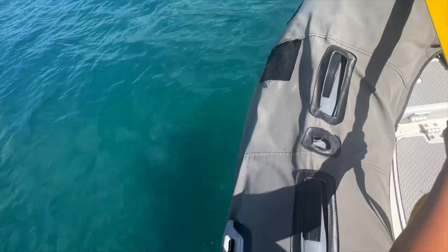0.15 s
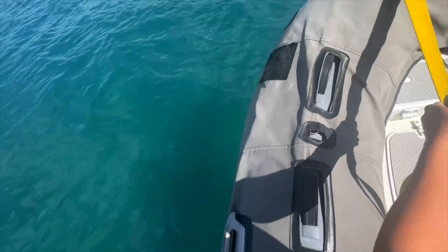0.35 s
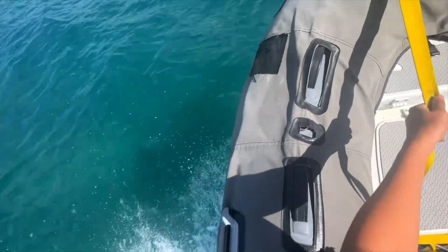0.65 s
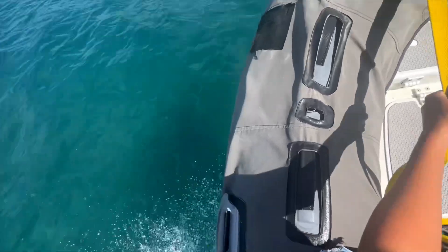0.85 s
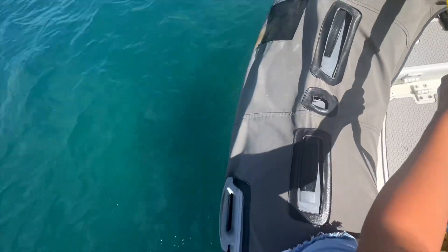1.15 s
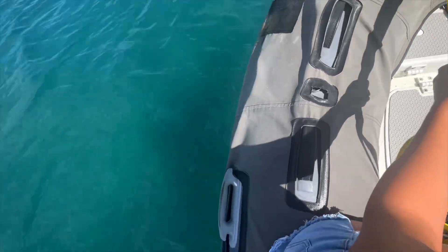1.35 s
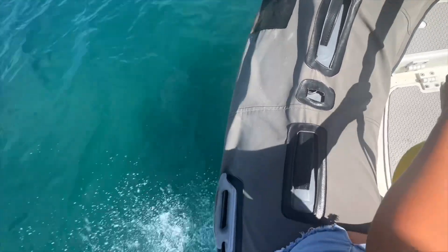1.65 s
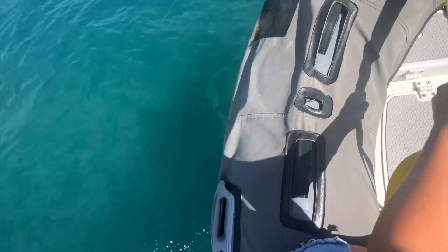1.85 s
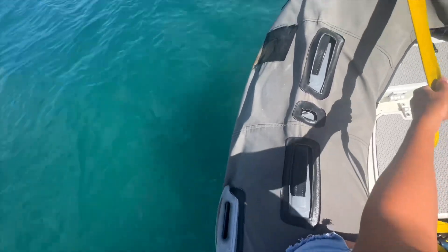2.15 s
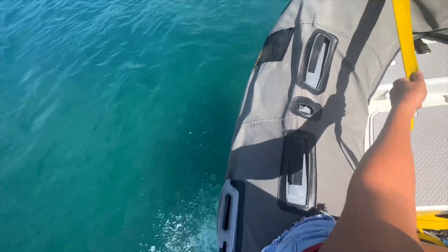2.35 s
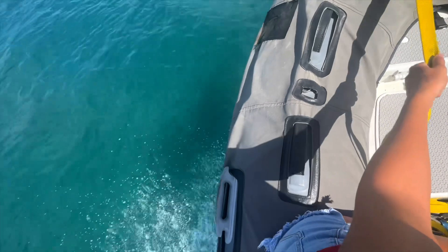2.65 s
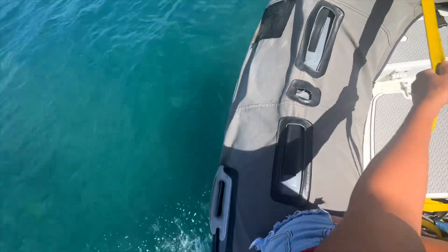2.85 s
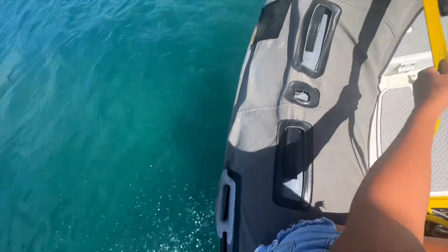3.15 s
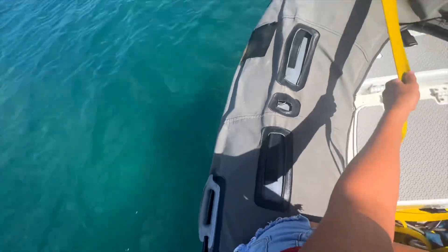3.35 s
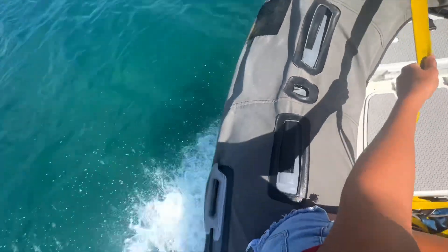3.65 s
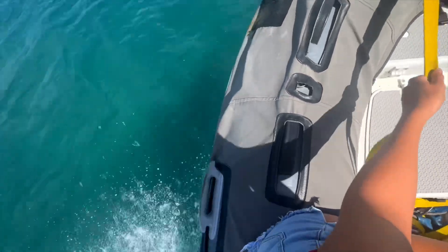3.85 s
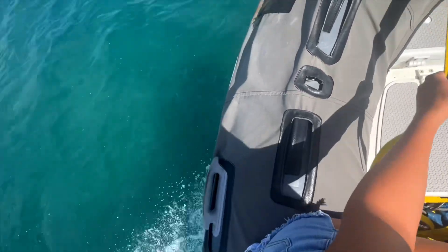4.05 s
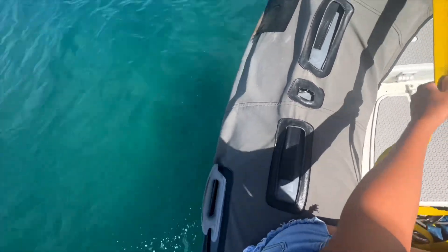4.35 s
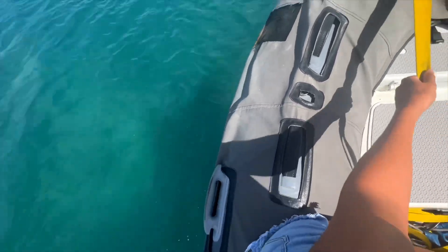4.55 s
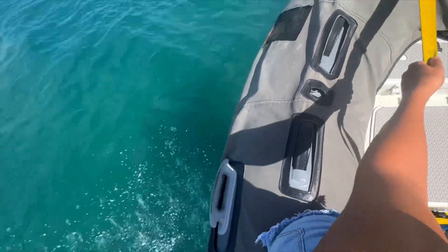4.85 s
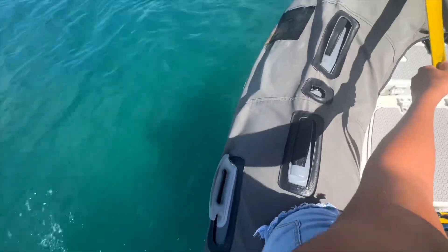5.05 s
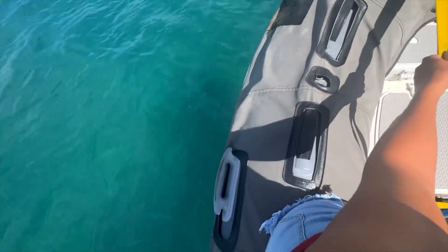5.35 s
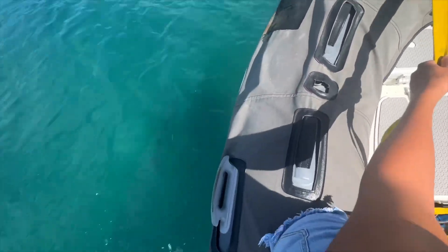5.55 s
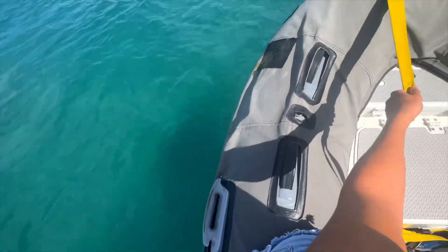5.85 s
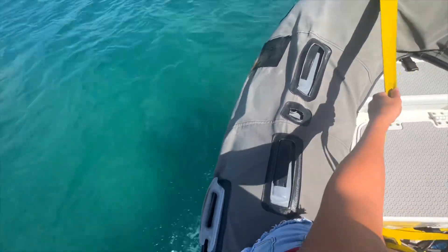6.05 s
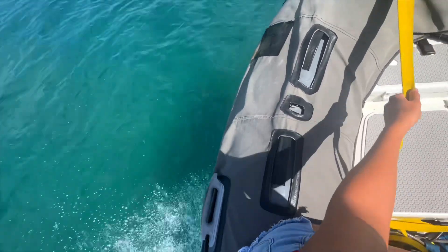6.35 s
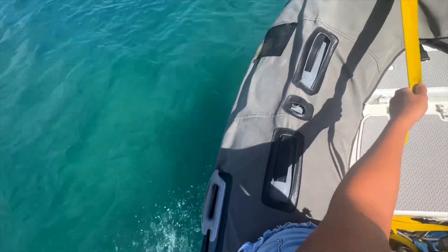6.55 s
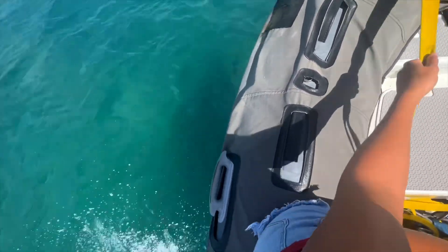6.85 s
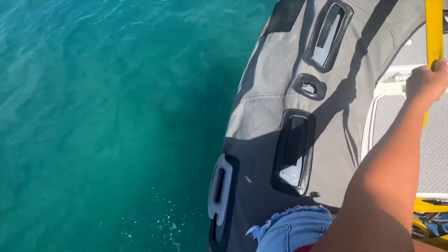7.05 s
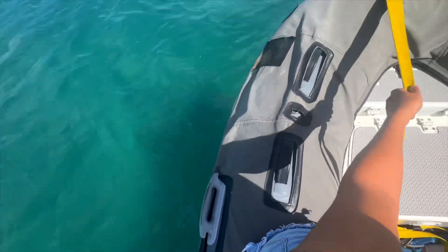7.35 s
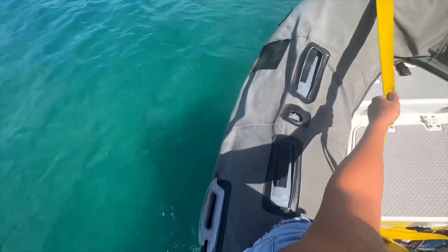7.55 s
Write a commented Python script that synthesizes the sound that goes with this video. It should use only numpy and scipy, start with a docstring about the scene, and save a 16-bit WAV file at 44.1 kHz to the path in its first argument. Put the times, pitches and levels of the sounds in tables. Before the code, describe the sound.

Aboard an inflatable dinghy on open, choppy water, a small outboard starts muffled and faint, then settles into a low burbling drone with a thin gear whine. Around one second a gust thumps and crackles on the microphone. Afterward the bow wave washes and froths, spray patters and hisses, and occasional waves slap the hull softly. The stereo sound is close, outdoors and without echo.

```python
"""A small outboard drones and burbles, its gears whining faintly, as an inflatable dinghy runs over choppy sea.
The bow wave washes, spray patters and hisses, and near the start a gust buffets the microphone.
Motor tones are partials locked to the firing phase; gas, water and wind are coloured stereo noise,
with random clicks for drops and ringing clicks for bubbles. Slaps and ticks are struck resonances."""
import sys
import numpy as np
from scipy import signal
from scipy.fft import rfft, irfft
from scipy.io import wavfile

SR = 44100
rng = np.random.default_rng(int(sys.argv[2]) if len(sys.argv) > 2 else 0)


def inscribe(sig):
    """Save sig as 16-bit PCM at rate SR to the path in sys.argv[1].

    A 1-D sig is mono; a 2-D sig holds one channel per row.
    Samples are clipped to [-1, 1] before scaling.
    """
    pcm = np.round(np.clip(np.atleast_2d(sig).T, -1, 1) * 32767)
    wavfile.write(sys.argv[1], SR, pcm.astype(np.int16))


N = 339808
TIME = np.arange(N) / SR
BINS_HZ = np.maximum(np.arange(N // 2 + 1) * SR / N, 1)

# bearing of the motor: [t/s, motor left-right/dB, left port lead/rad of a firing, bass stereo width/dB]
BEARING = [(0, -8, 0, -60), (1.1, 3, 0.25, -27), (1.5, 15.5, 0.34, -18), (2, 16, 0.3, -8.5),
           (2.6, 6.5, 0.38, -0.5), (3.6, 2.5, 0.22, 8), (4.5, 0.5, 0.12, 13), (5.1, -0.5, 0.21, 8),
           (5.6, -0.5, 0.17, 14), (6.3, 0, 0.13, 10.5), (7.71, 0, 0.11, 8)]


def exhaust(firing, low_db, octave_db, pipe_db, lean_db, lead_rad, smear_rad=0.37):
    """Each firing is a pressure dip, then the ring of the exhaust housing; the two cylinders differ slightly."""
    # upper partials of the firing pulse: [multiple of firing rate, relative level/dB]
    pipe_orders = [(3, -16), (4, -0.5), (5, 0), (5.5, -20), (6, -9.5), (7, -15), (8, -18)]
    # swell and fade of the fourth and fifth partials: [t/s, gain/dB]
    fourth_swell = [(0, -0.5), (2.05, -1), (2.5, -0.5), (2.66, 5.5), (2.77, -4.5), (2.9, 7), (3.0, 0),
                    (3.12, 5.5), (3.35, -4.5), (4.3, -1), (5.4, -1.5), (5.75, -2), (6.1, -3), (6.3, 3),
                    (6.5, -3.5), (6.95, 2), (7.15, -1.5), (7.71, 1.5)]
    fifth_swell = [(0, -0.5), (1.85, 1), (2.05, 0.5), (2.6, 0), (3.2, 0.5), (3.9, 0), (4.35, -3), (4.9, 1),
                   (5.15, -3), (5.45, -1.5), (5.95, 1.5), (6.6, 1), (7.05, -2), (7.3, 1), (7.52, -7),
                   (7.71, 2)]

    firing = firing + lead_rad * np.array([[.5], [-.5]])  # the nearer port hears the motor first
    half_orders = from_db(-29) * np.cos(3 * firing / 2)  # cylinder difference
    low = from_db(low_db + 2.5) * (partial(firing, waver=0.019, port_waver=0.093) + half_orders)
    octave = from_db(octave_db + 4.0) * partial(2 * firing, waver=0.023, port_waver=0.021)

    late = firing - 2.3 + 0.068 * drift(35)  # no two firings are alike
    swell_db = {4: in_time(fourth_swell)[0], 5: in_time(fifth_swell)[0]}
    pipe = 0
    for order, db in pipe_orders:
        phase = order * late - smear_rad * (order - 5) ** 2  # unequal delays smear the pulse
        gain = from_db(db + swell_db.get(order, 0))
        pipe = pipe + gain * partial(phase, waver=0.1, port_waver=0.12)
    pipe_gain = from_db(pipe_db + 2.1 * drift(35))
    return -(low + octave) * pan(lean_db) - pipe_gain * pipe * pan(.5 * lean_db)


def exhaust_levels():
    """Fundamental, octave and pipe ring in dB: slow course, flutter as water washes the outlet, brief dips."""
    # [t/s, fundamental/dB, octave/dB, pipe ring/dB], relative
    courses = [(0, -51, -53, -66), (.25, -36.5, -46, -55), (.5, -36, -42.5, -48.5),
               (1.48, -33, -45.5, -49.5), (1.67, -34.5, -38, -48), (2.03, -32, -37.5, -40),
               (2.65, -30, -32.5, -37), (3.0, -29, -32.5, -40.5), (3.5, -31.5, -35.5, -39.5),
               (3.85, -28.5, -35, -40), (4.55, -31, -35.5, -42), (5.3, -30, -37, -40),
               (5.85, -35.5, -36, -40), (6.45, -30.5, -34.5, -42.5), (7.3, -31, -36, -41),
               (7.71, -35.5, -44.5, -44.5)]
    # flutter spread: [fundamental/dB, octave/dB, pipe ring/dB]
    flutter_spread = (.8, .8, .8)
    # Gaussian level changes, mostly dips: [centre t/s, full 1/e width/s, fundamental/dB, octave/dB]
    dips = [(1.402, 0.18, -4, -0.5), (3.942, 0.054, 1, -13), (4.34, 0.1, -11, -2), (4.44, 0.041, -17, -2),
            (5.735, .04, -12, -2), (5.787, 0.12, 2, -8), (6.03, 0.089, -8, -1), (6.97, 0.11, -3.5, -3)]

    flutter_per_s = 3.4
    low_db, octave_db, pipe_db = (
        db + spread_db * drift(flutter_per_s) for db, spread_db in zip(in_time(courses), flutter_spread))
    low_dip, octave_dip = 0, 0
    for centre_s, width_s, low_change_db, octave_change_db in dips:
        shape = np.exp(-np.minimum((2 * (TIME - centre_s) / width_s) ** 2, 50))
        low_dip = low_dip + low_change_db * shape
        octave_dip = octave_dip + octave_change_db * shape
    return low_db + low_dip, octave_db + octave_dip, pipe_db


def burble(firing, pipe_db, lean_db, lead_rad):
    """Exhaust gas breaks up in the water, one puff per firing; the nearer port hears it first."""
    # [f/Hz, relative level/dB]
    gas_spectrum = [(32, -9), (45, -4.5), (65, 3.5), (125, -1.5), (190, -6.5), (290, -9), (390, -8.5),
                    (480, -18.5), (700, -27)]
    # [f/Hz, left-right correlation]
    port_likeness = [(60, 0.98), (140, 0.81), (205, .1), (290, 0.91), (600, 0.96)]

    puffs = 1 + 0.078 * np.cos(firing - 2.6)
    gas = spread(white() * puffs, gas_spectrum, at_bins(port_likeness), lean_db=-2.0)
    lag_samples = lead_rad / np.gradient(firing)
    n = np.arange(N)
    gas = np.array([np.interp(n + side * lag_samples, n, port) for side, port in zip((.5, -.5), gas)])
    return from_db(pipe_db + 0.6 + 0.75 * drift(10)) * gas * pan(0.096 * lean_db)


def cowl(firing):
    """Valve clatter keeps the cowl ringing in narrow modes, each swelling and fading by itself."""
    # [t/s, level/dB]
    course = [(0, -61), (.6, -51), (1.2, -53), (1.9, -51), (2.3, -52.5), (3, -57.5), (5, -57.5), (6.5, -54),
              (7.71, -60)]
    # [f/Hz, bandwidth/Hz, relative level/dB]
    modes = [(1145, 180, -0.5), (1340, 76, -4.5), (1698, 54, -4), (1830, 60, -10), (1967, 120, -4.5),
             (2124, 80, -11), (3340, 590, -13)]

    cowl_db, = in_time(course)
    clatter = white() * (1 + 0.32 * np.cos(firing - 1))
    ringing = 0
    for hz, width_hz, db in modes:
        gain = from_db(db + 3.4 * drift(9))
        ringing = ringing + gain * rms_one(ring(clatter, hz, t60_of(width_hz)))
    return from_db(cowl_db) * rms_one(ringing)


def whine(firing):
    """Thin gear tones follow the engine speed; three groups come and go."""
    # [t/s, low group/dB, middle group/dB, high group/dB]
    group_levels = [(0, -71, -79, -85), (1.2, -60, -63.5, -78), (2.05, -59, -63.5, -72),
                    (2.3, -62, -78, -87), (3.0, -55.5, -70, -75), (3.5, -83, -66.5, -70),
                    (4.7, -62, -74, -64.5), (5.4, -68, -78, -71), (6.3, -57.5, -76, -72),
                    (6.7, -63.5, -73, -68), (7.25, -56.5, -87, -78), (7.71, -71, -77, -73)]
    # per group: [multiples of firing rate]
    group_orders = [(18,), (26, 27), (29, 30)]

    out = 0
    for level_db, orders in zip(in_time(group_levels), group_orders):
        for order in orders:
            out = out + from_db(level_db) * partial(order * firing, waver=0.48, port_waver=0.38)
    return out


def gears(firing):
    """Faint, unsteady gear and valve tones locked to the crankshaft, loudest about half a second in."""
    # [multiple of firing rate, relative level/dB]
    tones = [(9, -60.5), (11, -65), (13, -76), (22, -63), (32, -73), (33, -69)]

    heard_db, = in_time([(0, -8), (.6, -5), (1.3, -7.5), (7.71, -6)])
    tone_sum = sum(from_db(db + 1.0) * partial(order * firing, waver=0.21, port_waver=1.0)
                   for order, db in tones)
    return from_db(heard_db) * tone_sum


def water(firing):
    """Bow wave froths with ringing bubbles; the motor's clatter pulses faintly in the splashing."""
    # [t/s, bow wave/dB, splashing/dB], relative
    wash = [(0, -55.5, -57), (.45, -51, -59.5), (1.2, -55.5, -55), (1.9, -55.5, -58.5), (3.0, -49, -51),
            (4.8, -50.5, -54), (7.25, -49.5, -55), (7.71, -52, -58.5)]
    # the bow pushes into a wave: [start t/s, length/s, bow wave change/dB]
    surges = [(3.19, 0.31, 2), (3.98, 0.12, 1), (5.13, 0.35, 3.5), (6.3, .13, -1), (6.58, 0.23, 0.5),
              (7.08, 0.17, 1)]
    # both spectra: [f/Hz, relative level/dB]
    bow_spectrum = [(250, 4), (480, -3.5), (600, -2), (720, -3), (880, 1), (970, -3), (1100, -19.5),
                    (1500, -6), (2500, -48)]
    splash_spectrum = [(600, -1), (1000, 1.5), (1170, 1), (1420, 0), (1560, 3.5), (1700, 1.5), (1820, -2.5),
                       (2020, 2), (2300, -8), (3200, -16)]

    splash_share = 0.14  # of the bow wave's change in dB
    surge_db, = water_rise(surges)
    wave_db, splash_db = in_time(wash) + np.outer([1, splash_share], surge_db)
    froth = white() + 0.3 * bubbles(700, low_hz=450, high_hz=1300, cycles=7.5)
    clatter_pulse = 1 + 0.063 * np.cos(firing)
    splash = white() * clatter_pulse + 0.17 * bubbles(1500, low_hz=1047, high_hz=2570, cycles=13.0)
    bow = from_db(wave_db + 1.5 + 1.1 * drift(22)) * around(froth, bow_spectrum)
    return bow + from_db(splash_db + 2.5) * flickering(splash, splash_spectrum, flicker_db=1.5, count=8)


def splashes():
    """Single splashes and gurgles: bursts of droplets and froth, each in a band of its own."""
    # [start t/s, length/s, level/dB, centre f/Hz, width/octaves]
    bursts = [(1.81, 0.098, -59, 1830, .15), (1.98, .24, -44.5, 362, 0.21), (2.02, 0.046, -54, 1780, 0.34),
              (2.5, .08, -54, 1500, 0.4), (2.983, 0.05, -52, 2020, 0.19), (3.105, 0.022, -54, 3460, 0.65),
              (3.192, .06, -42, 190, .5), (3.43, 0.092, -48, 190, 0.5), (3.222, 0.02, -43.5, 750, 0.78),
              (3.232, .018, -53, 4000, .9), (3.355, 0.012, -42.5, 1010, 1.3), (3.34, 0.017, -52, 3500, 0.7),
              (3.555, 0.05, -59, 2080, .15), (4.335, 0.074, -45, 190, 0.39), (4.446, .12, -56, 2020, 0.22),
              (5.086, 0.035, -56, 1370, 0.37), (5.11, 0.21, -41, 160, 1.1), (5.276, .06, -57, 950, 1.2),
              (5.51, .05, -54, 1950, .3), (6.67, .07, -43, 372, .3), (6.86, 0.15, -57, 2030, .2),
              (7.136, 0.052, -52, 780, 0.88)]

    froth, out = white() + 0.76 * rms_one(drops(900, size_db=11.0)), 0
    for start_s, length_s, db, hz, octaves in bursts:
        edges_hz = hz * 2 ** (np.array([-.5, .5]) * max(octaves, .05))
        edges_hz = np.clip(edges_hz, 20, .45 * SR)
        band_pass = signal.butter(2, edges_hz, "band", fs=SR, output="sos")
        band = rms_one(signal.sosfilt(band_pass, froth))
        out = out + from_db(db) * swell(start_s, length_s, attack_share=.25, release_s=0.017) * band
    return out


def slaps():
    """Waves slap the hull, which answers with short hollow notes."""
    # [t/s, peak/dB, f/Hz, t60/s]
    hits = [(4.27, -28, 148, 0.046), (5.139, -25.5, 207, 0.038), (6.28, -43, 392, 0.04)]
    return knocks(hits, contact_s=0.008)


def ticks():
    """Small ticks on the boat: very brief contacts, quickly damped."""
    # [t/s, peak/dB, f/Hz, t60/s]
    hits = [(.155, -41, 2600, .0008), (.2, -42, 2900, 0.001), (.239, -43, 4060, 0.00062),
            (.252, -38, 2300, 0.0006), (.352, -50, 3500, .0008), (5.384, -41, 3340, 0.0022)]
    return knocks(hits, contact_s=0.0011)


def spray():
    """Dense droplets patter back on the sea over the hiss of foam."""
    # [t/s, patter/dB, foam hiss/dB], relative
    steady = [(0, -63, -62), (.15, -63, -64), (.35, -62, -60), (.7, -59, -56.5), (1.2, -55.5, -58),
              (1.95, -58, -58.5), (2.3, -58, -59.5), (3.2, -57, -58.5), (4.9, -57.5, -59),
              (7.35, -57.5, -59.5), (7.71, -59.5, -64)]
    # thrown up by the bow: [start t/s, length/s, patter rise/dB, foam hiss rise/dB]
    showers = [(.7, 0.28, 1, 3), (1.7, 0.22, 3, 2), (2.02, 0.12, 1, 2), (2.42, 0.11, 0, 2.5),
               (2.72, 0.26, 1, 3), (3.2, 0.13, 1.5, 3), (3.5, 0.099, 0, 1.5), (4.22, 0.28, 1, 1),
               (5.25, 0.089, 0, 2.5), (6.5, 0.057, 3, 3), (6.76, 0.034, 0, 2)]
    # both spectra: [f/Hz, relative level/dB]
    patter_spectrum = [(1500, -11), (2400, 3.5), (2900, 4), (3200, 2.5), (3500, 3), (3900, 0.5), (4600, -1),
                       (5400, -4.5), (6500, -8)]
    foam_spectrum = [(4500, -6.5), (5500, -5), (6400, 0.5), (7500, -3), (8600, 0), (9700, -2.5),
                     (10500, -2), (12000, -5), (13500, 0)]

    patter_db, foam_db = in_time(steady) + water_rise(showers) + 0.5 * drift(39)
    patter = white() + 0.55 * rms_one(drops(4000, size_db=6.0))
    fizz = white() + 0.38 * rms_one(drops(7000, size_db=4.0))
    return (from_db(patter_db + 3.5) * flickering(patter, patter_spectrum, flicker_db=1.33, count=3)
            + from_db(foam_db + 2.5) * flickering(fizz, foam_spectrum, flicker_db=0.8, count=3))


def hollow():
    """Narrow hollow rings in the water noise: noise through doubled resonators."""
    # [t/s, low ring/dB, middle ring/dB, high ring/dB]
    courses = [(0, -78, -63, -71), (.4, -72, -76, -60.5), (1.0, -59, -63, -67), (1.25, -57, -56, -62.5),
               (2.03, -59, -58.5, -62), (2.2, -60, -70, -70), (3, -70, -83, -68), (5, -80, -77, -71)]
    # per ring: [f/Hz, single-resonator bandwidth/Hz]
    resonances = [(1090, 340), (1860, 440), (3520, 800)]

    noise, out = rng.standard_normal(N), 0
    for level_db, (hz, width_hz) in zip(in_time(courses), resonances):
        t60_s = t60_of(width_hz)
        tone = rms_one(ring(ring(noise, hz, t60_s), hz, t60_s))
        out = out + from_db(level_db + 1.5 * drift(22)) * tone
    return out


def gust():
    """Turbulence on the ports: lumpy rumble, fluttering rush and hard eddies, softly overloading."""
    # eddies: [t/s, relative peak/dB, trough-to-peak time/s, tearing/dB]
    eddy_rows = [(.591, -30, 0.003, -48), (0.617, -36, .003, -45), (0.706, -32, 0.004, -43),
                 (0.745, -22, 0.027, -45), (0.886, -17, 0.006, -45), (0.898, -18, 0.0059, -40),
                 (0.953, -20, 0.0059, -50), (1.028, -26, .004, -39), (1.043, -16, 0.003, -36),
                 (1.071, -13, 0.0052, -36), (1.093, -16, 0.0058, -53), (1.107, -20, 0.0076, -48),
                 (1.191, -18, 0.0043, -42), (1.239, -21, 0.0032, -47)]
    # both spectra: [f/Hz, relative level/dB]
    rumble_spectrum = [(20, -26), (45, -8), (90, 1.5), (140, 1.5), (200, -1), (300, -5), (600, -53)]
    rush_spectrum = [(120, -20), (260, 3), (480, 3.5), (690, 2), (850, -8), (1350, -11), (2200, -25),
                     (4000, -36)]
    # moves round to the left port: [t/s, left-right/dB]
    gust_lean = [(.55, -2.5), (.85, -5), (1.1, 4.5)]

    ceiling = .16  # amplitude of soft overload
    rumble_gain, rush_gain = gust_strength()
    eddies, tearing = np.zeros(N), np.zeros(N)
    for centre_s, db, length_s, tear_db in eddy_rows:
        u = np.clip((TIME - centre_s) / (length_s / 2), -10, 10)
        eddies += from_db(db) * u * np.exp((1 - u * u) / 2)  # suction, then a push
        tearing += from_db(tear_db) * np.exp(-u * u / 2)  # at the edge of the port

    rumble = spread(white(), rumble_spectrum, alike=0.98, lean_db=7.5)
    rumble = rumble_gain * from_db(0.3 + 1.1 * drift(28)) * rumble

    # lower rush mostly at the left port; upper rush opposed between the two
    alike = at_bins([(600, 0.48), (950, -0.67), (2500, -0.62)])
    rush_lean_db = at_bins([(680, 10.0), (950, 0.5)])
    rush = spread(white(), rush_spectrum, alike, rush_lean_db)
    rush = rush_gain * from_db(0.9 + 0.74 * drift(41)) * rush

    fray = rush_gain * from_db(-25.5 + 2.6 * np.minimum(drift(75), 2))  # quick flutters
    crackle_spectrum = [(250, -8), (700, 4), (1400, 15), (2500, -10)]
    crackle = np.hypot(tearing, fray) * spread(white(), crackle_spectrum, alike=0.14, lean_db=-1.0)

    lean_db, = in_time(gust_lean)
    pressure = (rumble + rush) * pan(lean_db) + from_db(-8.0) * eddies
    return ceiling * np.tanh(pressure / ceiling) + crackle


def gust_strength():
    """Gains of rumble and rush: the puffs add in power."""
    # [start t/s, length/s, relative rumble/dB, relative rush/dB]
    puffs = [(0.52, 0.016, -47, -39.5), (0.532, 0.2, -46, -31.5), (0.597, 0.12, -31.5, -34),
             (0.646, .05, -42, -33), (0.717, 0.059, -30, -36.5), (.775, 0.079, -32.5, -34),
             (0.871, 0.03, -30, -32), (0.928, 0.078, -32, -39), (1.015, 0.075, -30, -34),
             (1.086, 0.018, -29.5, -28), (1.128, 0.043, -33.5, -36), (1.184, 0.0076, -32, -37)]

    power = 0
    for start_s, length_s, *db in puffs:
        envelope = swell(start_s, length_s, attack_share=0.13, release_s=0.013)
        power = power + np.outer(from_db(db), envelope) ** 2
    return np.sqrt(power)


def breeze():
    """Light wind of the boat's own motion: a soft, lumpy rumble, much alike at the two ports."""
    # [t/s, level/dB]
    course = [(0, -46.5), (.45, -50), (1.3, -43.5), (3, -62), (3.9, -41), (5.2, -39.5), (5.8, -41.5),
              (6.3, -46), (7.1, -46.5), (7.71, -44.5)]
    # [f/Hz, relative level/dB]
    wind_spectrum = [(25, -12.5), (55, -2), (100, -5.5), (150, -9), (220, -13), (400, -28.5)]

    breeze_db, = in_time(course)
    return from_db(breeze_db + .5 * drift(14)) * spread(white(), wind_spectrum, alike=0.93, lean_db=1.0)


def partial(phase, waver, port_waver):
    """One engine partial: it wavers as a whole, and a little differently at each port."""
    sway = 1 + waver * (drift(5.4) + 1j * drift(3.5))
    ports = port_waver * (drift(6.9) + 1j * drift(3.1)) * np.array([[1], [-1]])
    return np.real((sway + ports) * np.exp(1j * phase))


def knocks(rows, contact_s):
    """Brief noisy contacts strike a resonance; each note is scaled to its peak level."""
    out = np.zeros(N)
    for start_s, db, hz, t60_s in rows:
        age_s = np.maximum(TIME - start_s, 0)
        contact = age_s * np.exp(-np.minimum(age_s / contact_s, 50))
        note = ring(rng.standard_normal(N) * contact, hz, t60_s)
        out += from_db(db) * note / np.abs(note).max()
    return out


def bubbles(per_s, low_hz, high_hz, cycles, count=16):
    """Bubbles of many sizes, each decaying by 60 dB over a given number of cycles."""
    born = drops(per_s, size_db=6.0)
    dealt = rng.integers(0, count, N)
    pitches_hz = np.geomspace(low_hz, high_hz, count)
    return rms_one(sum(ring(born * (dealt == k), hz, cycles / hz) for k, hz in enumerate(pitches_hz)))


def drops(per_s, size_db):
    """Random clicks at each port, of either sign and exponentially distributed dB size."""
    sizes = from_db(size_db * np.minimum(rng.exponential(1, (2, N)), 4))
    signs = rng.choice([-1, 1], (2, N))
    return sizes * signs * (rng.random((2, N)) < per_s / SR)


def white():
    """Two unrelated noises."""
    return rng.standard_normal((2, N))


def ring(clicks, hz, t60_s):
    """Two-pole resonator: a unit click starts a decaying sine of initial height 1."""
    r, w = np.exp(-np.log(1000) / (t60_s * SR)), 2 * np.pi * hz / SR
    return signal.lfilter([0, np.sin(w)], [1, -2 * r * np.cos(w), r * r], clicks + 1e-18)


def t60_of(width_hz):
    """Decay time in s of a resonance of this bandwidth."""
    return np.log(1000) / (np.pi * width_hz)


def flickering(sources, spectrum, flicker_db, count=4):
    """Each part of the spectrum swells and fades by itself."""
    field = rfft(around(sources, spectrum))
    edges_hz = np.geomspace(spectrum[1][0], spectrum[-1][0], count + 1)[1:-1]
    band = np.searchsorted(edges_hz, BINS_HZ)
    return sum(irfft(field * (band == k), N) * from_db(flicker_db * drift(10.6)) for k in range(count))


def around(sources, spectrum):
    """Sound that reaches the microphone from all round the boat."""
    # [f/Hz, left-right correlation, later limited to +-1]
    likeness = [(60, -5), (140, 7), (210, 7), (330, 1), (520, -0.35), (850, 0.12), (1150, 0.73),
                (1700, -0.77), (2080, 0.14), (2500, -0.25), (9000, 0.12), (10500, 1.1), (12200, 4),
                (13300, -0.94)]
    # [f/Hz, left-right/dB]
    lean = [(100, 12), (250, -1), (800, 1.5), (2000, 0.5), (2900, 3.5), (3500, 5), (4500, 9.5), (5300, 8),
            (6500, 2.5), (8000, 0), (9000, -1.5), (11000, 0)]
    return spread(sources, spectrum, at_bins(likeness), at_bins(lean))


def spread(sources, spectrum, alike, lean_db):
    """Two unrelated signals become a coloured stereo field of rms 1."""
    mid, side = rfft(sources) * colour(spectrum)
    alike = np.clip(alike, -1, 1)
    both = np.sqrt(1 + alike) * mid + np.sqrt(1 - alike) * side * [[1], [-1]]
    return rms_one(irfft(both * pan(lean_db), N))


def colour(spectrum):
    """Gain per bin; it falls 12 dB per octave beyond the ends of the table."""
    skirts = np.minimum(BINS_HZ / spectrum[0][0], 1) * np.minimum(spectrum[-1][0] / BINS_HZ, 1)
    return from_db(at_bins(spectrum)) * skirts ** 2


def water_rise(rows):
    """Level changes of surges or showers in dB: they build up, hold, then drain."""
    return sum(np.outer(rise_db, swell(start_s, length_s, attack_share=0.22, release_s=0.065))
               for start_s, length_s, *rise_db in rows)


def swell(start_s, length_s, attack_share, release_s):
    """Attack, hold and exponential release of one event; height 1."""
    age_s = TIME - start_s
    attack = np.clip(age_s / (attack_share * length_s), 0, 1)
    return attack * np.exp(-np.clip((age_s - length_s) / release_s, 0, 50))


def drift(rate_hz):
    """Smooth random wander of rms 1: noise through two equal low-pass poles at rate_hz."""
    step = 40  # samples per slow sample
    r = np.exp(-2 * np.pi * rate_hz * step / SR)
    noise = rng.standard_normal(N // step + 2002)
    slow = signal.lfilter([1], [1, -2 * r, r * r], noise)[2000:]  # drop the settling
    return np.interp(np.arange(N) / step, np.arange(len(slow)), rms_one(slow))


def in_time(rows):
    """Each column of a curve table, joined by straight lines."""
    s, *columns = np.transpose(rows)
    return [np.interp(TIME, s, c) for c in columns]


def at_bins(points):
    """A table over frequency, joined on a log axis."""
    hz, value = np.transpose(points)
    return np.interp(np.log(BINS_HZ), np.log(hz), value)


def pan(db):
    """Left and right gains for a level difference."""
    return from_db(np.array([[.5], [-.5]]) * db)


def from_db(db):
    """Decibels to gain."""
    return 10 ** (np.asarray(db) / 20)


def rms_one(x):
    """Scale to an rms of 1."""
    return x / np.sqrt(np.mean(x ** 2) + 1e-20)


def scene():
    """Motor, water and wind together; the engine speed sags a little under the waves."""
    # [t/s, firing rate/Hz]
    speed = [(0, 66.5), (.5, 66.3), (1.4, 64.45), (1.8, 64.5), (2.15, 64.95), (3.15, 64.8), (3.6, 65.2),
             (4.8, 64.85), (5.25, 64.05), (5.75, 64.85), (6.4, 64.5), (6.7, 64.1), (7.25, 64.4),
             (7.71, 64.1)]

    firing_hz, = in_time(speed)
    low_db, octave_db, pipe_db = exhaust_levels()
    lean_db, lead_rad, _ = in_time(BEARING)
    firing = 2 * np.pi * np.cumsum(firing_hz * (1 + 0.001 * drift(8.5))) / SR  # phase/rad
    motor = exhaust(firing, low_db, octave_db, pipe_db, lean_db, lead_rad)
    motor = motor + burble(firing, pipe_db, lean_db, lead_rad)
    motor = motor + cowl(firing) + whine(firing) + gears(firing)
    sea = water(firing) + splashes() + slaps() + ticks() + spray() + hollow()
    return motor + sea + gust() + breeze()


def record(dry):
    """The sound starts dull with a centred bass, then opens; the deepest bass and the top are cut."""
    # gain above about 9 kHz: [t/s, gain/dB]
    brightness = [(0, -6), (.2, -12), (.45, -10), (.8, -7.5), (1.1, -0.5), (7.71, 1)]

    *_, width_db = in_time(BEARING)
    top_db, = in_time(brightness)
    field = rfft(dry) / (1 + (30 / BINS_HZ) ** 6)
    bass_side = irfft((field[0] - field[1]) / 2 / (1 + (BINS_HZ / 170) ** 6), N)
    top = irfft(field / (1 + (9000 / BINS_HZ) ** 12), N)
    widening = (from_db(width_db) - 1) * bass_side * [[1], [-1]]
    heard = irfft(field, N) + widening + (from_db(top_db) - 1) * top
    cutoff_hz = 13700
    low_pass = signal.ellip(10, .1, 80, cutoff_hz, fs=SR, output="sos")
    return signal.sosfilt(low_pass, heard)


dry = scene()
out = record(dry)
inscribe(out)
```